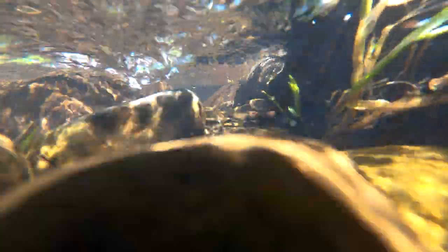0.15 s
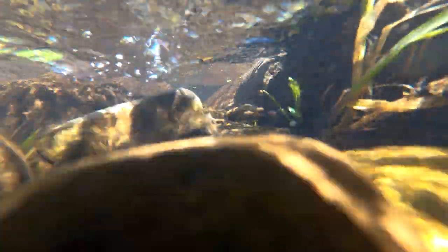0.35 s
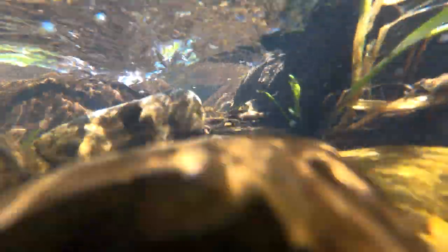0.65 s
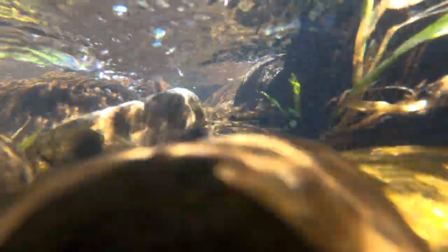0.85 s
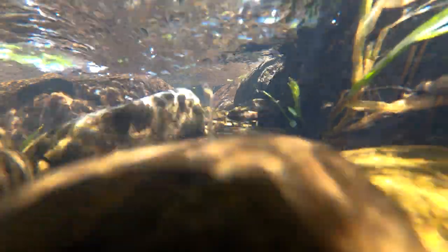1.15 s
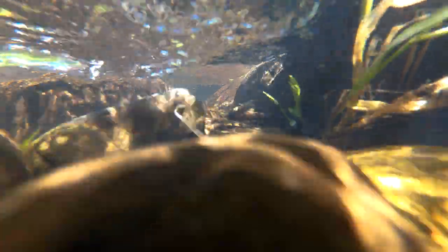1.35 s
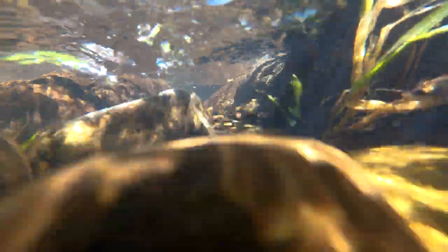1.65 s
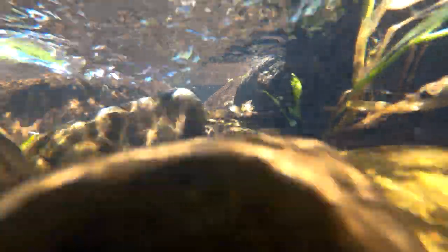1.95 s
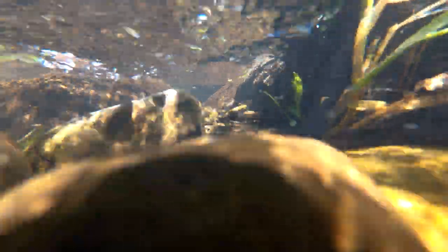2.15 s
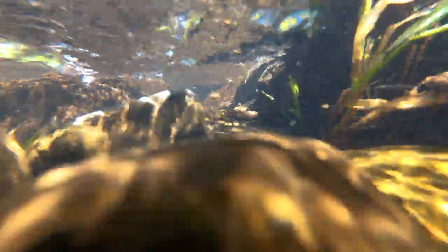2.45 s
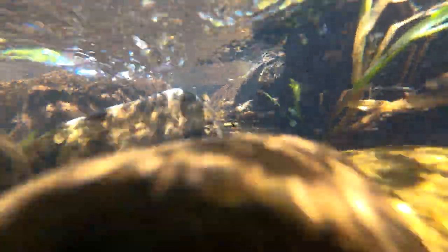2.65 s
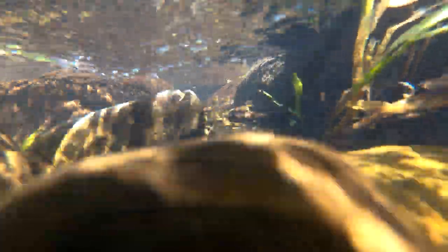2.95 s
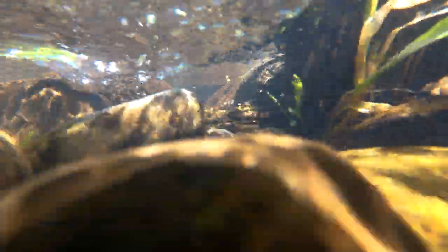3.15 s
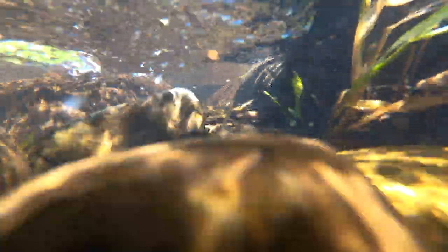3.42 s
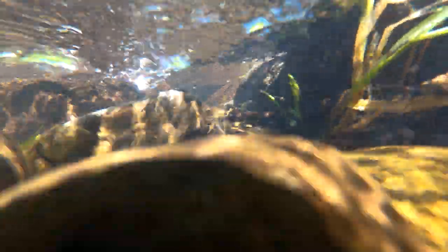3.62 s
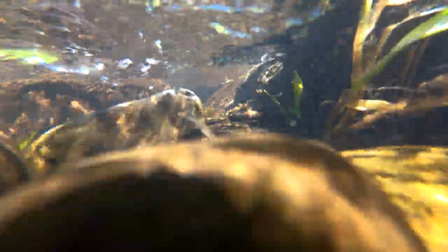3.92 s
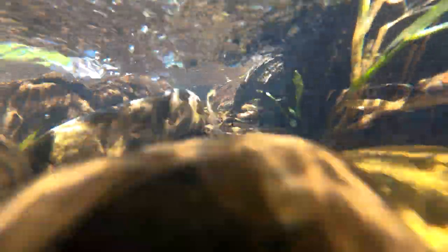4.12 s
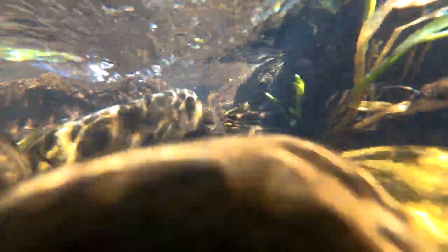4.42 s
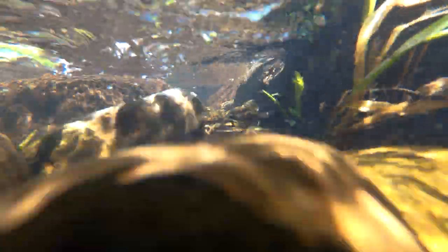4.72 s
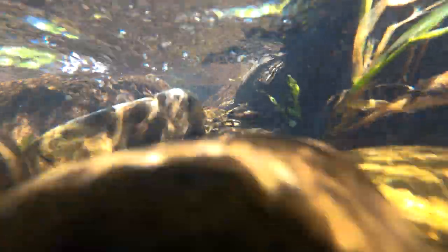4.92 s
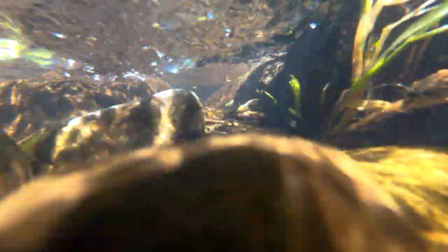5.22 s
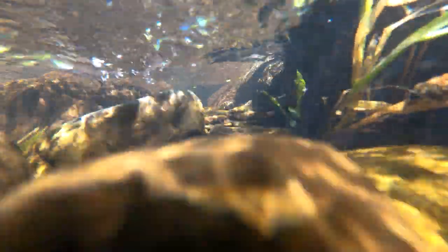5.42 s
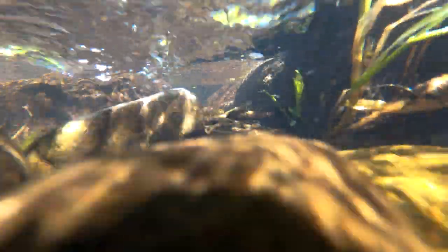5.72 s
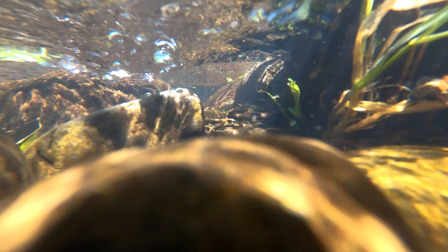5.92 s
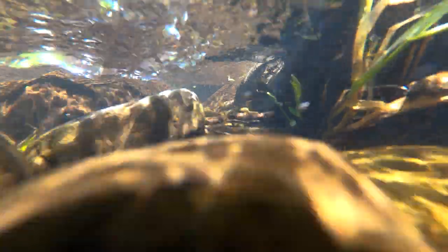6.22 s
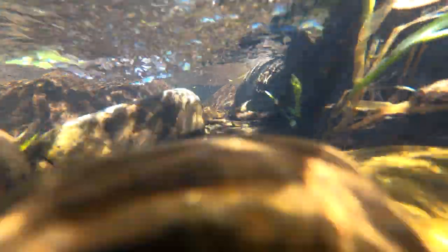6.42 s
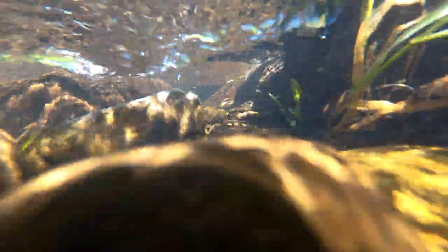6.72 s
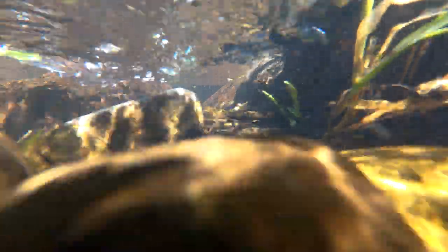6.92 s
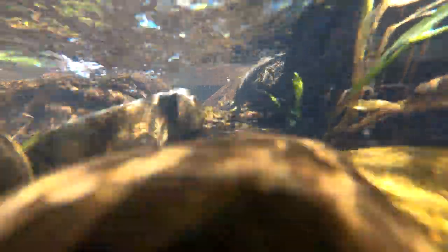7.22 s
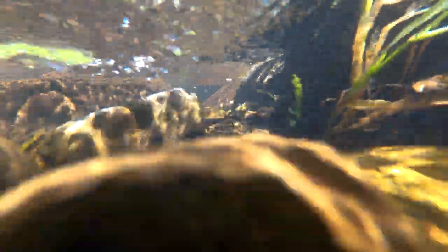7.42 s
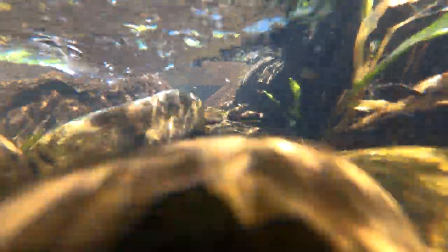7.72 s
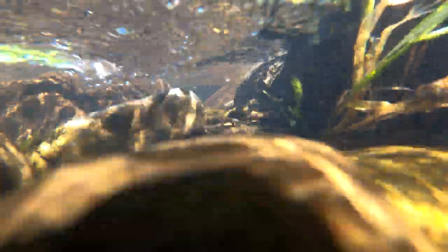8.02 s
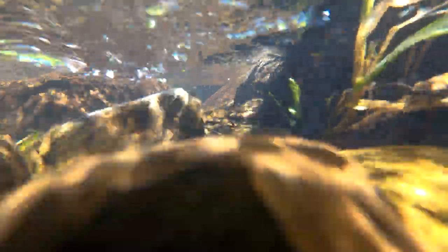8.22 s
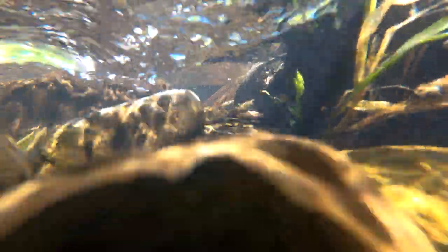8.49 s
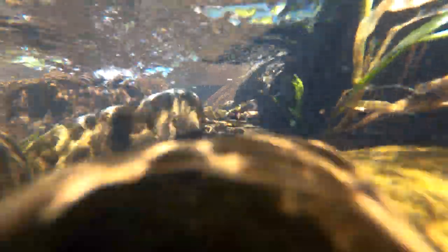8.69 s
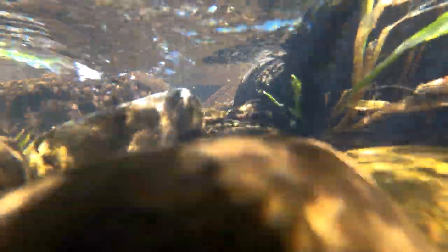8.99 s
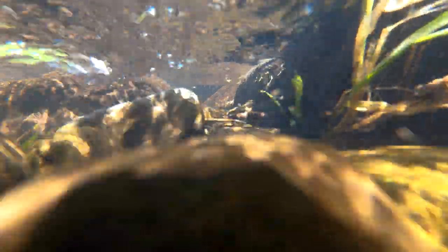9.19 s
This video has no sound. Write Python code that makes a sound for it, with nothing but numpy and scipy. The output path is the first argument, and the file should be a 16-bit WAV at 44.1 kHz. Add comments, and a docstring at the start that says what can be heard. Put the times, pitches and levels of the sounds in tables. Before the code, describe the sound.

For about 9.4 seconds we are under a shallow rocky stream, the microphone sealed in a housing. A deep, bassy rumble of current runs throughout, wavering gently and by far the loudest layer. Above it lies faint hissy wash and a fine, restless babble of tiny bubbles and sand grains, coming in irregular bursts. Clear bubbles plink at random: a small cluster near 0.2 s, a prominent mid-pitched blip at 1.7, busy blips and ticks from 1.9 to 2.4, then a thinner stretch around 3. The babble is fuller near 4.3; sharp, very high ticks stand out around 4.9 and 5.1, and again at 6.6. After a lighter patch near 7.8, clicks and plinks thicken from 8.4, ending in a tight cluster at 9.3. Grit ticks dryly on the casing all along; reflections are short and dull.

```python
"""Under water in a rocky stream

The microphone sits in a sealed camera housing, in the shallows, with the current rumbling against it.
Close by, air bubbles are pinched off and ring as short damped sines; swarms of faint ones babble.
Drifting grit ticks on the housing, whose lid, lens and port ring as broad, damped modes.
Rocks and the surface add a short, dull tail; behind lie the wash of far water and microphone hiss,
both shaped noise."""
import sys
import numpy as np
from scipy import signal
from scipy.fft import rfft, irfft, next_fast_len
from scipy.io import wavfile
from scipy.ndimage import map_coordinates

SR = 44100
rng = np.random.default_rng(int(sys.argv[2]) if len(sys.argv) > 2 else 0)


def waveform_to_disk(signal):
    """Save audio, clipped to [-1, 1], as 16-bit WAV at the path in sys.argv[1]."""
    frames = np.transpose(np.atleast_2d(signal))
    scaled = np.clip(frames, -1, 1) * 32767
    samples = np.round(scaled).astype(np.int16)
    wavfile.write(sys.argv[1], SR, samples)


N = 412335

# flow on the housing, relative spectrum: (frequency [Hz], density [dB per Hz])
RUMBLE_SPECTRUM = [(4, -18), (26, -1.5), (45, -4.5), (66, 2), (92, -4.5), (113, -10), (136, -22),
                   (156, -22), (250, -37.5), (400, -62), (900, -120)]
# swells of the current: (time [s], rumble swell [dB], babble swell [dB])
CURRENT_SWELLS = [(0, -2.5, 4.5), (1, -1.5, 3), (1.7, -0.5, 5.5), (2.5, -1, 4.5), (3.5, 0, 2.5),
                  (4.3, -1.5, 7.5), (5.2, -1.5, 2), (5.8, -1, 3.5), (6.5, -0.5, 4), (7.2, -2, 5.5),
                  (7.8, -1, 1), (8.3, 0, 3.5), (8.8, -3, 3.5), (9.35, -2, 2)]
# clearest bubbles near the microphone:
# (time [s], starting pitch [Hz], level before the soft start [dB], starting glide [% a cycle])
NEAR_BUBBLES = [(.036, 1660, -39, -.6), (.0714, 12430, -23, -1), (.1004, 7300, -42, .5),
                (.187, 1350, -40, -.1), (.2064, 1330, -33, -2), (.211, 3870, -38, -.9),
                (.217, 2250, -18, 0), (.2173, 4300, -29, -1.2), (.249, 2180, -34, -.5),
                (.262, 2550, -41, 0), (.397, 1740, -37, .4), (.402, 780, -42, 0), (.421, 1310, -33, -.1),
                (.5675, 13890, -32, -1.1), (.6, 1190, -31, -.4), (.63, 1500, -42, .9),
                (.812, 1220, -35, .7), (.84, 11860, -26, -1.2), (.852, 11870, -38, -.3),
                (1.025, 2180, -37, -1), (1.1105, 1130, -33, -.8), (1.1347, 14430, -35, .1),
                (1.1985, 2220, -29, -.3), (1.2587, 6270, -34, -.2), (1.351, 11220, -27, -1.8),
                (1.3673, 9810, -42, 0), (1.4966, 5040, -22, -.5), (1.5713, 5000, -23, -.2),
                (1.6, 5940, -30, .4), (1.602, 1360, -35, -.6), (1.6535, 2680, -31, -.6),
                (1.6537, 1190, -29, .2), (1.678, 2510, -15, -.1), (1.679, 1130, -37, .7),
                (1.764, 1120, -32, .4), (1.7975, 6090, -34, -.5), (1.87, 14260, -33, -.1),
                (1.899, 4620, -25, -.3), (1.9083, 4540, -20, -1.1), (1.9863, 1640, -36, .1),
                (1.9864, 4640, -26, -.8), (2.043, 10240, -31, -.3), (2.066, 1070, -33, -1.7),
                (2.0815, 1230, -29, 1.1), (2.1123, 15190, -22, .2), (2.1666, 1160, -37, .1),
                (2.1863, 3700, -23, -1.1), (2.198, 3270, -37, -.2), (2.292, 3330, -32, -2),
                (2.293, 11740, -35, -1.8), (2.299, 2230, -34, -2.5), (2.315, 1610, -40, .2),
                (2.317, 6780, -36, -.5), (2.342, 11380, -28, -.1), (2.3635, 14720, -31, 1.3),
                (2.374, 1780, -30, .3), (2.3854, 5580, -31, -.4), (2.458, 2490, -42, 0),
                (2.512, 1000, -40, 0), (2.5513, 5370, -42, 0), (2.555, 800, -42, 0), (2.623, 950, -40, .1),
                (2.68, 2290, -37, -2.5), (2.6825, 3350, -27, -1.3), (2.7134, 1030, -37, -1.4),
                (2.78, 740, -37, .9), (2.817, 1010, -39, 0), (2.846, 2890, -35, -1.7), (2.98, 800, -42, 0),
                (3.05, 2210, -29, -.5), (3.151, 1230, -37, -.6), (3.281, 1190, -38, .1),
                (3.291, 2040, -40, -.4), (3.34, 1000, -40, .2), (3.367, 14460, -20, -.8),
                (3.436, 6230, -30, -.5), (3.567, 1230, -33, -1.6), (3.592, 11540, -26, -.2),
                (3.6055, 5850, -21, -.5), (3.616, 4740, -27, -.7), (3.619, 2470, -40, 0),
                (3.755, 1220, -33, -1.3), (3.787, 2100, -25, .1), (3.812, 1120, -33, .3),
                (3.836, 890, -41, 0), (3.8925, 930, -42, .2), (3.909, 13710, -37, 0), (4.021, 1350, -34, 0),
                (4.022, 10500, -34, -.7), (4.112, 9940, -36, -1.5), (4.123, 1080, -37, -.4),
                (4.258, 14800, -27, 1), (4.308, 2060, -40, .2), (4.3425, 770, -35, -1.8),
                (4.343, 1010, -41, -.3), (4.357, 1540, -35, 1.2), (4.362, 1170, -29, -1.4),
                (4.384, 1210, -37, .5), (4.4313, 2120, -27, -.3), (4.461, 12090, -24, -.4),
                (4.482, 7700, -35, -.8), (4.6188, 6150, -21, -1.4), (4.714, 2760, -35, -.3),
                (4.733, 7000, -35, -.2), (4.845, 3540, -20, -.1), (4.9048, 14270, -12, -2.2),
                (4.95, 1990, -35, -.6), (4.9503, 14520, -37, -1.5), (4.979, 11840, -28, -.6),
                (4.988, 2100, -41, 0), (5.018, 2050, -41, -.3), (5.019, 1360, -37, -.7),
                (5.0674, 11880, -14, -.6), (5.094, 900, -39, 0), (5.1, 6780, -36, -.2),
                (5.119, 800, -38, .5), (5.1215, 15220, -36, .2), (5.31, 2150, -43, 0), (5.32, 1100, -42, 0),
                (5.361, 4950, -35, -.3), (5.4224, 1030, -32, .2), (5.446, 1700, -43, -.7),
                (5.489, 1350, -39, -.3), (5.521, 930, -35, 1), (5.807, 6130, -30, -.5),
                (5.945, 1150, -38, -.9), (5.9855, 14960, -30, .2), (6.135, 1510, -34, -2.2),
                (6.285, 990, -25, -.1), (6.321, 14980, -37, .3), (6.372, 5640, -16, -1),
                (6.376, 2430, -37, -.5), (6.38, 1340, -27, .3), (6.485, 6440, -39, -.5),
                (6.526, 1550, -32, .1), (6.572, 10170, -14, -1.5), (6.577, 1420, -28, .3),
                (6.5771, 14140, -11, 0), (6.765, 1340, -38, .5), (6.886, 6010, -29, -.8),
                (6.988, 4090, -16, -.8), (7.018, 1250, -39, -.3), (7.0607, 1270, -34, .5),
                (7.0674, 14750, -27, 0), (7.07, 1110, -34, .8), (7.075, 1020, -38, -1.3),
                (7.09, 1620, -36, -.7), (7.1195, 7460, -38, -1.8), (7.12, 1500, -31, 0),
                (7.131, 960, -37, 1), (7.19, 2360, -36, .2), (7.238, 8480, -39, -.6),
                (7.27, 3590, -29, -.8), (7.317, 1100, -39, -.7), (7.41, 900, -42, -.3),
                (7.486, 5110, -29, -.2), (7.5757, 1130, -27, .2), (7.635, 1150, -41, 0),
                (7.721, 4910, -33, -.3), (7.7255, 4650, -32, 0), (7.7258, 7010, -33, -.5),
                (7.823, 1340, -39, -.2), (7.935, 1230, -37, .8), (8.068, 13640, -34, .6),
                (8.083, 3570, -37, -.2), (8.101, 1030, -34, 0), (8.171, 12130, -31, 0),
                (8.2134, 11170, -40, -.2), (8.304, 1740, -31, .3), (8.333, 10150, -32, -.3),
                (8.334, 1050, -38, .3), (8.357, 1160, -33, .1), (8.4045, 4120, -42, 0),
                (8.4137, 1740, -23, .5), (8.4545, 4650, -16, -1.5), (8.5287, 8070, -26, -.4),
                (8.5507, 14400, -39, .2), (8.717, 12700, -17, -.3), (8.78, 5430, -30, 0),
                (8.851, 5940, -25, -.4), (8.895, 1150, -38, -1), (8.9017, 7060, -42, 0),
                (8.938, 1300, -39, -.6), (8.94, 14630, -22, -.3), (8.965, 4370, -29, -.4),
                (9.005, 2650, -37, -1.2), (9.0216, 1680, -33, .1), (9.0737, 1810, -26, -.2),
                (9.0738, 2420, -35, .2), (9.099, 920, -38, .1), (9.122, 880, -38, .5),
                (9.1795, 1040, -39, 0), (9.267, 3900, -44, 0), (9.291, 3950, -26, 0),
                (9.2923, 2450, -22, -.4), (9.2953, 8820, -22, -1.3), (9.3, 5420, -27, -.7),
                (9.3143, 13650, -19, -1.7)]
# swarms of faint bubbles: (rate [per s], middle pitch [Hz], pitch spread [octaves],
# middle t60 [cycles], least level before swells [dB], size spread [dB])
FAINT_SWARMS = [(93.7, 1100, 0.301, 46, -54, 3), (49.6, 2150, 0.14, 54, -60.5, 1.5),
                (14.3, 3200, 0.27, 38, -58, 3.5), (30.2, 12500, 0.37, 70, -61.5, 3)]
# clearest ticks of grit: (time [s], level before chance strength [dB], place [0 lid, 1 lens, 2 port])
GRIT_TICKS = [(0.21, -22, 1), (.426, -41, 0.49), (0.571, -31, 0.93), (0.6054, -35, 0.54), (.658, -41, 1.2),
              (.697, -37, 0.32), (.721, -51, 1.1), (.782, -37, 1), (.864, -38, 0.98), (.998, -34, 2),
              (1.086, -39, 0), (1.098, -44, 1), (1.1353, -22.5, .5), (1.209, -39, 0.77), (1.358, -35, 0.23),
              (1.438, -28, 0.63), (1.471, -40, 1.2), (1.523, -31.5, .8), (1.6726, -34, 2),
              (1.949, -28, 0.42), (2.055, -27.5, 0.6), (2.1173, -25, 2), (2.174, -29, 0.65),
              (2.299, -33, 0.94), (2.681, -30, 1.06), (3.084, -28.5, 0.93), (3.1845, -41, 2),
              (3.6016, -26, 1), (3.689, -39, 0), (3.712, -31, 1.2), (4.1415, -35, .1), (4.696, -32, 0.17),
              (4.837, -36, 0.17), (4.855, -33, 2.7), (4.877, -29, 2.3), (4.929, -26, 0.65),
              (5.195, -33, 0.25), (5.2187, -35, 1), (5.421, -26, 0.96), (5.509, -31, .8),
              (5.6583, -34.5, 0), (5.75, -39, 0.89), (5.788, -34, 0.022), (6.007, -27.5, 0.44),
              (6.152, -28, 0.59), (6.445, -42, 2.1), (6.5785, -28, 0.91), (6.647, -33.5, 0.73),
              (6.994, -37, 0.68), (7.12, -26.5, 0.47), (7.502, -34.5, 0), (7.883, -30.5, .8),
              (7.9332, -30.5, 0.9), (8.514, -35, 1.1), (8.533, -30, 1.9), (8.55, -28, 0.65),
              (8.63, -29.5, 0.59), (8.699, -29.5, 1), (8.7634, -38, 1), (8.826, -35, 1),
              (8.8587, -34, 0.28), (9.005, -37, 0.066), (9.1958, -26, 0.63)]
# low modes of the housing: (frequency [Hz], width [Hz], level [dB])
LID_MODES = [(1100, 450, -12), (2100, 450, 0)]
# high modes of the housing: (frequency [Hz], width [Hz], level [dB])
LENS_MODES = [(3600, 900, -7), (4800, 1600, 0)]
# air in the microphone port: (frequency [Hz], width [Hz], level [dB])
PORT_MODES = [(13000, 5000, 0), (7500, 3000, -14)]
# the whole shell flexing: (frequency [Hz], width [Hz], level [dB])
SHELL_MODES = [(306, 660, -3)]
# far water and microphone hiss, relative spectrum: (frequency [Hz], density [dB per Hz])
WASH_SPECTRUM = [(150, -12.5), (250, 0), (337, -1.5), (601, -7), (1090, -11.5), (1690, -15), (2120, -19),
                 (2710, -20.5), (3720, -20.5), (5200, -27.5), (8630, -31), (15100, -29), (16500, -69)]

MIDDLE_HZ = 2500  # pitch of a bubble of middle size
SETTLE_CYCLES = 12  # time constant in which a new bubble rounds out
LIFE_CYCLES, LIFE_DB_PER_OCTAVE = 80.5, -1  # t60 of a steady bubble; smaller ones ring fewer cycles
GLIDE_DAMPS = 0.32  # a bubble that changes shape fast dies sooner, per % of glide
SNAP_LID_DB, SNAP_PORT_DB = -12.5, -18  # pinch-off snap in lid and port
FALL_DB = 13  # a tick one place away from a part rings it this much less
HISS_TOP_HZ, TOP_HZ = 15800, 16950  # top of wash and faint bubbles; upper band limit of the camera


def current_rumble(rumble_db):
    """The current presses unsteadily on the housing: deep noise that swells with the flow."""
    return amp(-20.0 + rumble_db) * noise(RUMBLE_SPECTRUM)


def near_bubbles():
    """Size sets the pitch; size and glide set how long each clear bubble rings."""
    s, hz, db, glide = np.transpose(NEAR_BUBBLES)
    octaves_small = np.maximum(np.log2(hz / MIDDLE_HZ), 0)
    steady_cycles = LIFE_CYCLES * amp(LIFE_DB_PER_OCTAVE * octaves_small)
    cycles = steady_cycles / (1 + GLIDE_DAMPS * np.abs(glide))
    return ring(zip(s, hz, db, 1000 * cycles / hz, glide), rise=3.1)


def swarms(babble_db):
    """Faint bubbles pinch off at random moments, louder while the babble swells."""
    rows = []
    for rate, middle_hz, octaves, life_cycles, db, spread_db in FAINT_SWARMS:
        count = int(rate * N / SR)
        when, size = rng.random((2000, 2))[:count].T  # when: share of the scene
        pitch_luck, life_luck, glide_luck = rng.standard_normal((2000, 3))[:count].T
        pitch = np.clip(middle_hz * 2 ** (octaves * pitch_luck), 500, HISS_TOP_HZ)
        size_db = np.minimum(-spread_db * np.log(1 - size), 10)  # many small, few large
        swell_db = babble_db[(when * N).astype(int)]
        t60_ms = 1000 * life_cycles / pitch * np.exp(.3 * life_luck)
        rows += zip(when * N / SR, pitch, db + size_db + swell_db, t60_ms, .12 * glide_luck)
    return ring(rows, rise=1.1)


def ring(rows, rise):
    """Each bubble is a damped sine with a soft start, of time constant 1 / rise cycles or longer."""
    tones = np.zeros(N + SR)
    for s, hz, db, t60_ms, glide in rows:
        t = np.arange(int(t60_ms * SR / 1000)) / SR
        cycles = hz * t
        if glide > 0:  # the pitch climbs on while the bubble nears the surface
            bend = cycles ** 2 / 2
        else:  # or drops at first and then holds, as the bubble rounds out
            bend = SETTLE_CYCLES * cycles - SETTLE_CYCLES ** 2 * (1 - np.exp(-cycles / SETTLE_CYCLES))
        phase = 2 * np.pi * (cycles + glide / 100 * bend)
        swell = 1 - np.exp(-rise * cycles * min(1, hz / MIDDLE_HZ))  # large bubbles start more softly
        envelope = amp(db - 60000 * t / t60_ms) * swell
        tones[round(s * SR):][:len(t)] -= envelope * np.sin(phase)
    return tones[:N]


def snaps():
    """Sample and level of each near bubble's pinch-off snap, hardest for fairly small bubbles."""
    s, hz, db, _ = np.transpose(NEAR_BUBBLES)
    return np.round(s * SR).astype(int), db - 8 * np.abs(np.log2(hz / 5000))


def thuds():
    """The pressure step of each near bubble pushes the whole shell, most for bubbles of middle size."""
    s, hz, db, _ = np.transpose(NEAR_BUBBLES)
    push_db = db - 6 * np.abs(np.log2(hz / MIDDLE_HZ))
    return struck(np.round(s * SR).astype(int), push_db, SHELL_MODES, contact_hz=1500)


def ticks():
    """A tick rings each part of the housing as hard as it is near; bubble snaps ring lid and port."""
    s, db, place = np.transpose(GRIT_TICKS)
    at = np.round(s * SR).astype(int)
    lid_db, lens_db, port_db = (db - FALL_DB * np.abs(place - part) for part in range(3))
    snap_at, snap_db = snaps()
    both_at = np.r_[at, snap_at]
    lid = struck(both_at, np.r_[lid_db, snap_db + SNAP_LID_DB], LID_MODES, contact_hz=6000)
    lens = struck(at, lens_db, LENS_MODES, contact_hz=12000)
    port = struck(both_at, np.r_[port_db, snap_db + SNAP_PORT_DB], PORT_MODES, contact_hz=40000)
    return lid + lens + port


def sand(eddies_db):
    """Fine grains patter on lid, lens and port, each part with its own contact."""
    grains = grit(LID_MODES, 8600, eddies_db, count=1200, level_db=-65.0, spread_db=5.0)
    grains += grit(LENS_MODES, 13000, eddies_db, count=700, level_db=-62.5, spread_db=6)
    grains += grit(LENS_MODES + PORT_MODES, 30000, eddies_db, count=1100, level_db=-65.5, spread_db=5.5)
    return grains


def grit(modes, contact_hz, bursts_db, count, level_db, spread_db):
    """Sand grains strike in loose clumps, many faint and a few strong."""
    clumps = N * rng.random(count // 3)
    scatter = .025 * SR * rng.standard_normal(count)
    at = (np.resize(clumps, count) + scatter).astype(int) % N
    size_db = np.minimum(spread_db * rng.exponential(size=count), 16)
    return struck(at, level_db + bursts_db[at] + size_db, modes, contact_hz)


def struck(at, db, modes, contact_hz):
    """Blows ring broad, damped modes, each at a new strength; a soft contact dulls the top."""
    luck_db = 2 * rng.standard_normal((len(at), len(modes)))
    out = np.zeros(N)
    for k, (centre, width, mode_db) in enumerate(modes):
        def shape(f):
            resonance = 1j * f * width / (centre * centre - f * f + 1j * f * width)
            return resonance / (1 + 1j * f / contact_hz) ** 4

        blows = np.bincount(at, amp(db + mode_db + luck_db[:, k]), N)
        scale = SR / (1.5 * np.pi * width) / abs(shape(centre))  # a unit blow peaks near 1
        out += (-1) ** k * scale * filtered(blows, shape)
    return out


def rocks(x, t60, dull_hz):
    """Rocks and the surface send back a short, dull, diffuse tail."""
    t = np.arange(SR // 20) / SR
    tail = rng.standard_normal(len(t)) * amp(-60 * t / t60) * (t > .0008)
    echo = signal.fftconvolve(x, tail / np.linalg.norm(tail))[:N]
    return filtered(echo, lambda hz: 1 / (1 + 1j * hz / dull_hz) ** 2)


def far_wash(eddies_db):
    """Far water and microphone hiss: noise that follows the babble at under half its swing in dB."""
    hiss = filtered(noise(WASH_SPECTRUM), lambda hz: hz < HISS_TOP_HZ)
    return amp(-59 + 0.45 * eddies_db) * hiss


def wobble(rate):
    """A smooth random curve, rate knots a second."""
    knots = rng.standard_normal(int(N * rate / SR) + 4)
    return map_coordinates(knots, [np.arange(N) * rate / SR])


def noise(spectrum):
    """Noise of rms 1 coloured by (frequency [Hz], density [dB]) points on a log axis."""
    f, db = np.transpose(spectrum)
    colour = lambda hz: amp(np.interp(np.log(hz + 1), np.log(f + 1), db))
    x = filtered(rng.standard_normal(N), colour)
    return x / np.sqrt(np.mean(x ** 2))


def filtered(x, response):
    """Sound x with its spectrum multiplied by a complex response of frequency."""
    m = next_fast_len(N + SR // 2)
    return irfft(rfft(x, m) * response(np.fft.rfftfreq(m, 1 / SR)), m)[:N]


def curves(rows):
    """One value per sample for each column after the time."""
    s, *cols = np.transpose(rows)
    return [np.interp(np.arange(N) / SR, s, c) for c in cols]


def amp(db):
    """Gain of a level in dB."""
    return 10 ** (np.asarray(db) / 20)


def scene():
    """Rumble, bubbles, ticks, grit and far wash; eddies bring the faint bubbles and grit in bursts."""
    rumble_db, babble_db = curves(CURRENT_SWELLS)
    eddies_db = babble_db + 3 * wobble(6)
    rumble = current_rumble(rumble_db)
    wash = far_wash(eddies_db)
    grains = sand(eddies_db)
    near = near_bubbles() + swarms(eddies_db) + ticks() + grains
    shell = thuds()
    echoes = amp(-9.5) * rocks(near, t60=0.025, dull_hz=4100)
    return (rumble + wash + near + shell + echoes)[None]


def record(dry):
    """The camera keeps nothing above its band limit; the last 400 Hz below it fade out."""
    return filtered(dry[0], lambda hz: np.clip((TOP_HZ - hz) / 400, 0, 1))[None]


dry = scene()
out = record(dry)
waveform_to_disk(out)
```